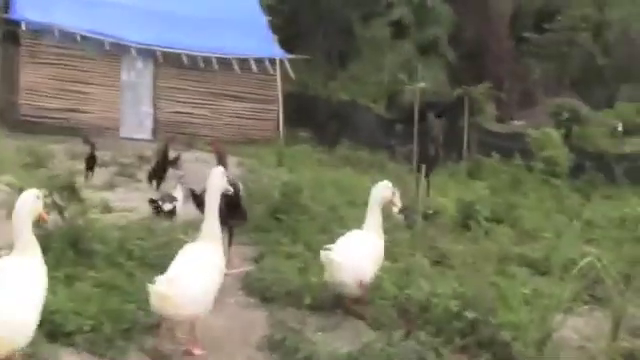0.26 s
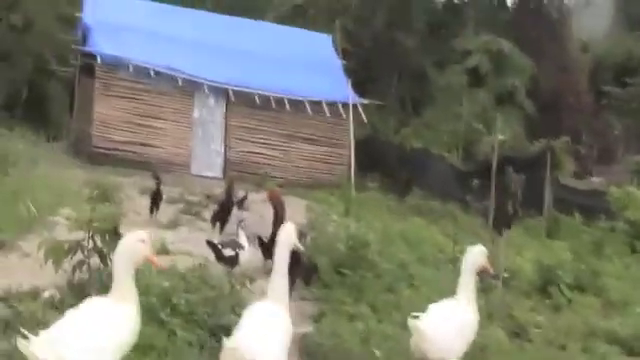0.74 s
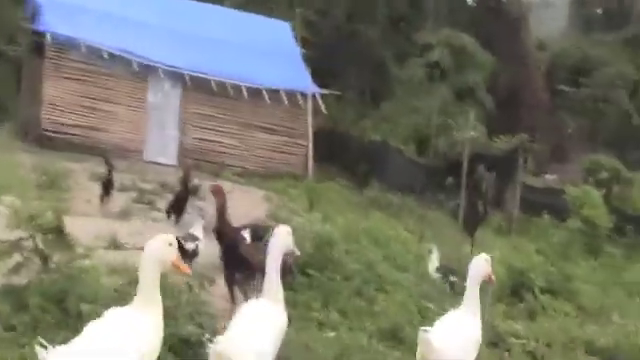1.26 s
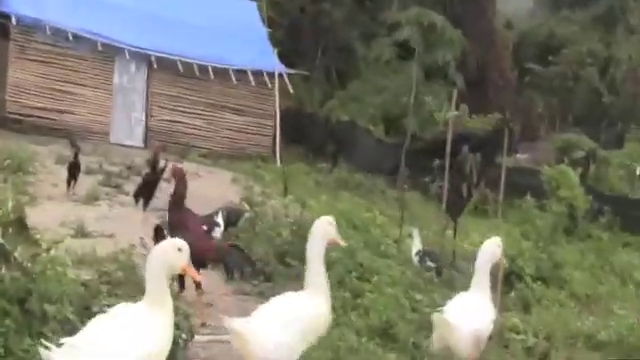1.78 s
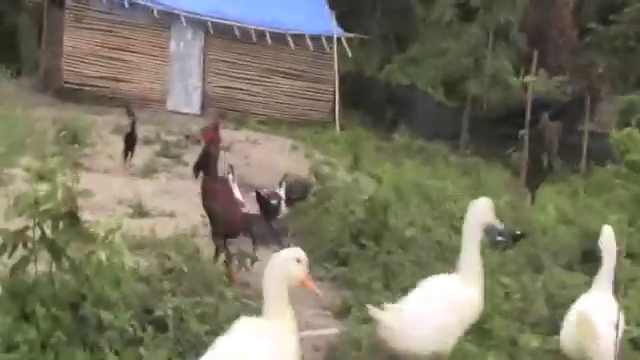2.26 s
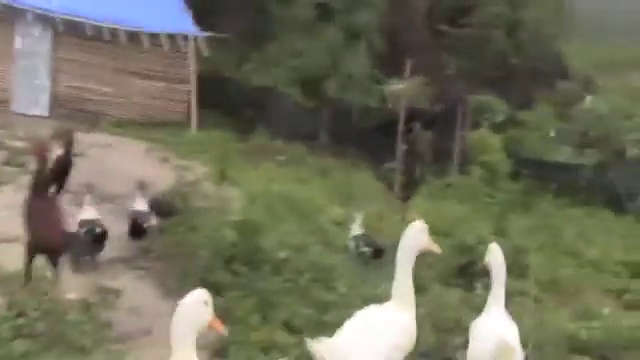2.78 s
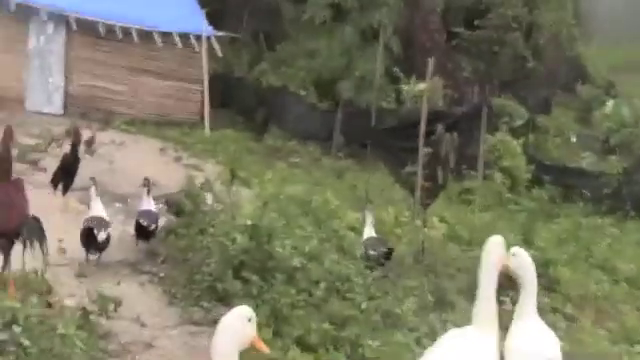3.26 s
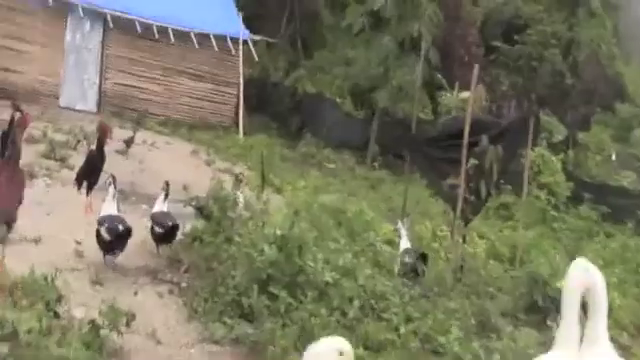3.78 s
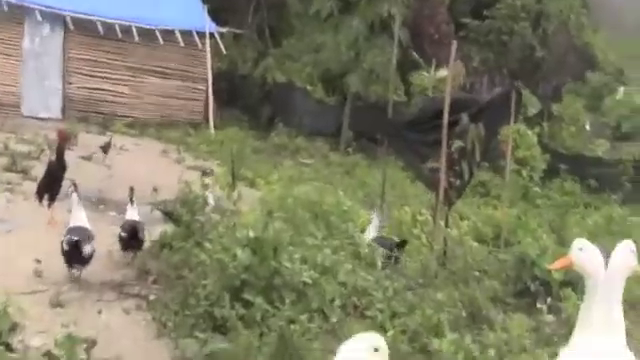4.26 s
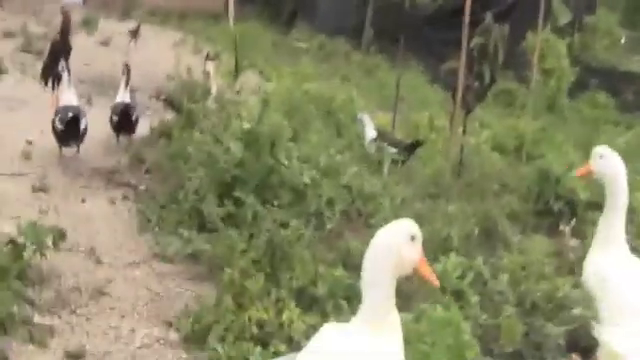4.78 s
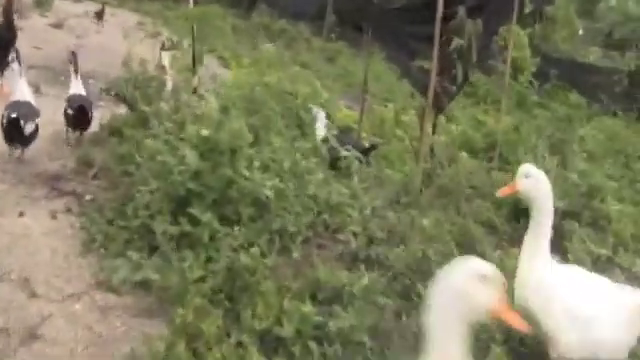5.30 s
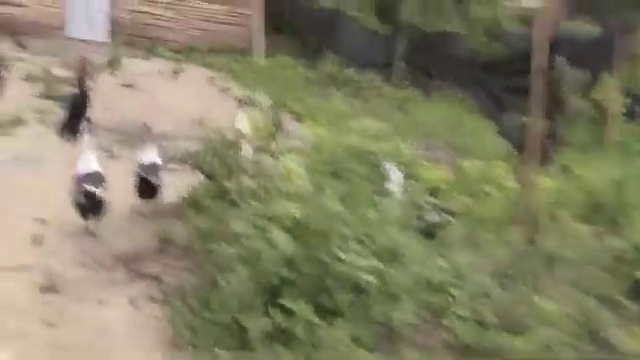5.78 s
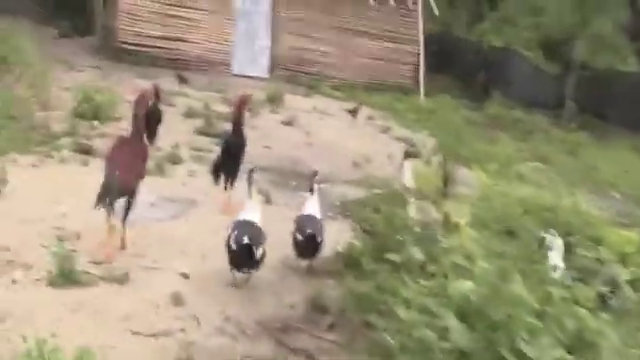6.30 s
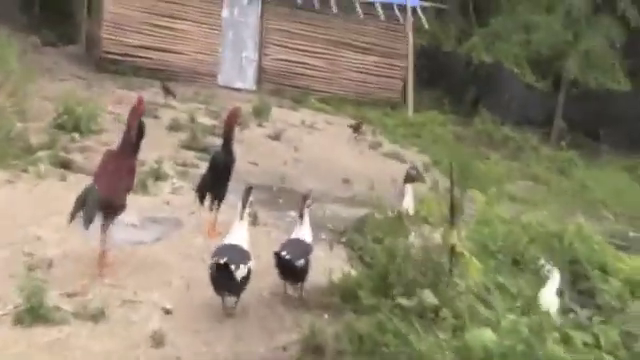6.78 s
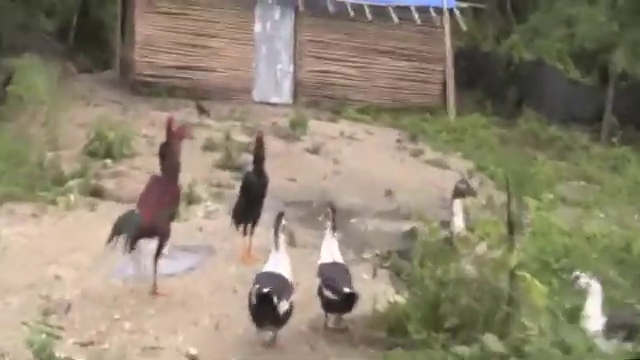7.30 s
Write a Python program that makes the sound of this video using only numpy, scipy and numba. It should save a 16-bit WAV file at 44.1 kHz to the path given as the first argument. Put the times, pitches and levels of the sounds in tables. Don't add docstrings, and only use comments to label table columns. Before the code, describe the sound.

Overlapping short duck quacks, breathy puffs and bill snaps run continuously outdoors, with raspy drake calls and faint hen croons over soft leaf rustle.

```python
import sys
import numpy as np
from scipy import signal
from scipy.io import wavfile
from scipy.ndimage import uniform_filter1d
from numba import njit

SR = 44100
rng = np.random.default_rng(int(sys.argv[2]) if len(sys.argv) > 2 else 0)


def how_loud(loudness_db):
    steps = np.asarray(loudness_db, float) / 20
    return 10 ** steps


def inscribe(sig):
    pcm = np.round(np.clip(np.atleast_2d(sig).T, -1, 1) * 32767)
    wavfile.write(sys.argv[1], SR, pcm.astype(np.int16))


N = 332778
LEFT_RIGHT = np.array([[1], [-1]])


@njit
def svf(x, hz, width):
    y, b, l = np.empty(len(x)), 0., 0.
    for i in range(len(x)):
        g, k = np.tan(np.pi * hz[i] / SR), width[i] / hz[i]
        v = (b + g * (x[i] - l)) / (1 + g * (g + k))
        b, l, y[i] = 2 * v - b, l + 2 * g * v, k * v
    return y


def band(x, hz, width):
    hz, width = hz + np.zeros(len(x)), width + np.zeros(len(x))
    return svf(svf(x, hz, width), hz, width)


def modes(x, table):
    return sum((-1) ** k * how_loud(db) * band(x, hz, width) for k, (hz, width, db) in enumerate(table))


def unit(x):
    return x / np.sqrt(np.mean(x ** 2) + 1e-18)


def peak_to(x, db):
    return x * how_loud(db) / np.sqrt(uniform_filter1d(x ** 2, size=350).max() + 1e-18)


def walk(rate_hz):
    hold = int(SR / rate_hz)
    steps = np.repeat(rng.standard_normal(N // hold + 1), hold)
    return 1.7 * uniform_filter1d(uniform_filter1d(steps, hold), hold)[:N]


def arch(size, skew, power):
    return abs(np.sin(np.pi * np.linspace(0, 1, size) ** skew)) ** power


def add(out, piece, s):
    i = int(s * SR)
    out[i:i + len(piece)] += piece[:N - i]


def flaps(hz, jitter, scatter_db, since=0):
    turns = np.cumsum(hz * np.exp(jitter * walk(150))) / SR
    turns = turns - turns[since]
    flap = np.diff(np.floor(turns), prepend=0) > 0
    return unit(flap * how_loud(scatter_db * rng.standard_normal(N))), turns % 1


def drake():
    # (start [s], length [s], hiss [dB], throat [dB], fade over the rasp [dB])
    rasps = [(0, 0.24, -41.5, -25, -11.5), (0.581, 0.63, -34.5, -25.5, -34), (1.298, 0.45, -38, -27.5, -21),
             (1.875, 0.07, -30.5, -24.5, 8.5), (1.942, 0.28, -40, -28.5, -5), (2.606, 0.36, -42, -30, -3.5),
             (3.258, 0.31, -42, -27, -5), (4.014, 0.43, -30.5, -19.5, -33), (4.65, 0.43, -37, -25.5, -17.5),
             (5.4, 0.36, -45.5, -34.5, 4), (6.077, 0.25, -42, -30, -3), (6.769, 0.27, -41.5, -31.5, -3),
             (7.046, 0.16, -50, -45, 7.5), (7.498, 0.11, -39.5, -24.5, 9)]
    # (centre [Hz], width [Hz], level [dB])
    throat_modes = [(487, 1450, -2), (1100, 590, 2.5), (1650, 770, 1), (3100, 4060, -8), (4200, 2830, -4)]
    # (centre [Hz], width [Hz], level [dB])
    hiss_modes = [(4900, 6800, 3), (10440, 4200, 5.5)]
    throat_wander = .1
    clicks, phase = flaps(130 + np.zeros(N), jitter=.6, scatter_db=3.5)
    air = rng.standard_normal((2, N)) * (.5 + np.exp(-phase / .3)) * how_loud(3 * walk(45))
    throat_gain, hiss_gain = np.zeros((2, N))
    for s, length_s, hiss_db, throat_db, fade_db in rasps:
        size = int(length_s * SR)
        push = arch(size, .55, .45) * how_loud(np.linspace(0, fade_db, size))
        add(throat_gain, how_loud(throat_db) * push, s)
        add(hiss_gain, how_loud(hiss_db) * push, s)
    drifting = [(hz * np.exp(throat_wander * walk(30)), width_hz, db + 2 * walk(35))
                for hz, width_hz, db in throat_modes]
    rasp = unit(modes(air[0] + .28 * unit(band(clicks, 1400., 2000.)), drifting))
    hiss = unit(modes(air[1] + .04 * clicks, hiss_modes))
    return throat_gain * rasp, hiss_gain * hiss


def yard():
    # (frequency [Hz], density [dB per Hz])
    spectrum = [(18, -63), (30, 5), (81, -24), (189, 6.5), (353, -3.5), (1190, 5), (1530, 1.5),
                (7530, -15.5), (9900, -10), (11500, -39), (15000, -75), (22000, -120)]
    level_db = -40
    out = 0
    point_hz, point_db = np.transpose(spectrum)
    for hz in 35 * 2 ** np.arange(0, 8.6, .5):
        mid, side = (unit(band(rng.standard_normal(N), hz, hz / 1.65)) for _ in range(2))
        density_db = np.interp(np.log(hz), np.log(point_hz), point_db)
        db = density_db + 10 * np.log10(hz) + 2.8 * walk(12)
        out = out + how_loud(db) * (mid + 0.48 / (1 + hz / 3000) * side * LEFT_RIGHT)
    return unit(out) * how_loud(level_db)


def throat(drive, voiced, table, breathy_width, voiced_width, skew, overtone_db, purity):
    out, tail = np.zeros(N), 500
    for s, length_s, db, start_hz, end_hz in table:
        i, size = int(s * SR), int(length_s * SR)
        puff = drive[i:i + size] * arch(size, skew, 0.34)[:N - i]
        puff = np.append(puff, np.zeros(tail))
        hz = np.interp(np.arange(len(puff)), [.1 * size, .9 * size], [start_hz, end_hz])
        voicing = np.append(voiced[i:i + size], np.zeros(tail) + voiced[i])
        width = breathy_width + (voiced_width - breathy_width) * voicing
        if length_s < .062:
            whistle = np.sin(2 * np.pi * np.cumsum(hz) / SR)
            whistle += .5 * np.sin(2 * np.pi * np.cumsum(2.15 * hz) / SR)
            swell = arch(size, skew, 1)[:N - i] * (1 - voiced[i:i + size])
            puff[:-tail] += purity * whistle[:-tail] * swell
        ring = band(puff, hz, width) + how_loud(overtone_db) * band(puff, 2.1 * hz, width)
        add(out, peak_to(ring, db), s)
    return out


def far_flock(count, mean_db):
    draw = rng.random((count, 5)).T
    start_s, length_s = 7.4 * draw[0], .008 + .04 * draw[1]
    start_hz = 550 * 4 ** draw[3]
    end_hz = start_hz * (.7 + .6 * draw[4])
    calls = np.transpose([start_s, length_s, mean_db + 9 * draw[2], start_hz, end_hz])
    rasp = flaps(140 + np.zeros(N), jitter=.3, scatter_db=4)[0] + .7 * rng.standard_normal(N)
    ticks = (rng.random(N) < 6 / SR) * how_loud(4 * rng.standard_normal(N))
    voices = throat(rasp, np.zeros(N), calls, 450., 450., .7, -8, .05)
    return voices + how_loud(-22) * band(ticks, 2600., 4500.)


def bill_snaps():
    # (time [s], peak [dB], ring [Hz])
    snaps = [(0.0972, -15, 1730), (0.146, -18, 1530), (0.3514, -14.5, 1560), (0.587, -23, 1590),
             (0.614, -13.5, 1600), (0.712, -19, 1220), (1.0105, -13, 1660), (1.0475, -24, 1630),
             (1.1638, -23, 1780), (1.269, -16, 1250), (1.3853, -10.5, 1410), (1.5574, -16, 1510),
             (1.7035, -17.5, 1540), (1.8936, -14, 1600), (1.9153, -9, 3030), (1.9669, -16, 1580),
             (2.0013, -6.5, 1590), (2.9087, -14, 1280), (2.945, -19, 1200), (3.1862, -30, 2050),
             (3.328, -13.5, 1480), (3.5866, -16.5, 1830), (3.611, -26, 1460), (3.6246, -26, 1500),
             (3.675, -26, 1390), (3.7842, -16, 1290), (3.8611, -19.5, 1550), (3.9488, -16.5, 1320),
             (4.0063, -12, 1230), (4.0257, -22, 1450), (4.1062, -15, 1320), (4.1433, -16, 1270),
             (4.1942, -28, 1320), (4.2028, -19, 1660), (4.2261, -8.5, 1550), (4.5134, -14, 1250),
             (4.6048, -20, 2420), (4.631, -22, 1430), (4.6543, -20, 1192), (4.6788, -8, 1270),
             (4.754, -28, 1210), (4.885, -17, 1940), (5.1798, -13.5, 1940), (5.422, -15, 1930),
             (5.5134, -11, 1220), (5.627, -14, 1390), (6.1356, -12, 1690), (6.1617, -8, 1630),
             (6.3936, -29, 1230), (6.491, -11, 1860), (6.526, -13, 1310), (6.7565, -27, 4000),
             (6.8427, -10.5, 1410), (6.8973, -13, 1640), (6.9654, -23, 1360), (6.9908, -17, 1380),
             (7.077, -18, 1490), (7.5154, -18, 1650)]
    decay_s, crack_share = 0.00071, 0.27
    out, t = np.zeros(N), np.arange(300) / SR
    for s, db, hz in snaps:
        crack = unit(band(rng.standard_normal(len(t)), 2670.0, 5400.0))
        ring = np.sin(2 * np.pi * hz * t)
        add(out, how_loud(db) * np.exp(-t / decay_s) * (ring + crack_share * crack), s)
    return out - band(out, 135.0, 1260.0)


def score():
    # (start [s], throat [dB], chest [dB], peep [dB], peep top [Hz])
    clucks = [(0.144, -23, -34, -26.5, 1723), (.283, -25.5, -40, -41, 1970), (0.995, -35, -34.5, -44, 1600),
              (1.179, -31, -36.5, -30.5, 1550), (1.806, -36, -37, -42, 1610), (2.334, -27, -42, -38, 1960),
              (2.523, -25.5, -40.5, -37.5, 1892), (3.036, -26.5, -37.5, -45, 1500),
              (3.388, -30, -41, -30, 2145), (3.903, -24.5, -38, -31, 1503), (4.254, -27, -33, -29, 2053),
              (4.841, -23.5, -33, -22, 1934), (5.011, -23.5, -33, -26.5, 1830),
              (5.255, -24, -33, -31, 1347), (5.405, -25, -32.5, -25.5, 1996), (5.59, -27, -40, -27.5, 1895),
              (5.803, -30.5, -38.5, -32, 1317), (6.267, -29, -34.5, -26, 1750),
              (6.45, -29, -33.5, -28.5, 1695), (3.733, -29, -40, -34, 1474),
              (4.512, -22.5, -31, -27.5, 1225), (5.937, -32.5, -32, -51, 1270),
              (7.252, -31.5, -32, -28.5, 1885), (7.42, -31, -33.5, -25, 1900)]
    # (start [s], length [s], throat [dB], chest [dB], pulse rate [Hz])
    open_quacks = [(0.294, 0.054, -27.5, -36, 177.3), (0.368, 0.03, -18, -31, 204.9),
                   (0.61, 0.057, -28, -38.5, 193.8), (1.618, 0.037, -30.5, -37, 155.6),
                   (2.155, 0.059, -23.5, -29.5, 201.8), (2.412, 0.03, -14, -32, 210),
                   (2.603, 0.049, -28, -37.5, 212.6), (2.819, 0.04, -34, -30.5, 200.3),
                   (3.468, 0.044, -13.5, -28.5, 220.5), (4.075, 0.045, -33, -52, 201.2),
                   (4.158, 0.023, -11.5, -30.5, 198.4), (5.605, 0.041, -22, -35, 178.3),
                   (6.084, 0.033, -31.5, -37.5, 212)]
    # (start [s], length [s], throat [dB], chest [dB], pulse rate [Hz])
    opening_quacks = [(1.288, 0.074, -28, -44.5, 173.7), (1.874, 0.046, -25.5, -30.5, 262.7),
                      (1.972, 0.05, -27, -31.5, 197.6), (2.231, 0.023, -24.5, -36, 197.3),
                      (3.119, 0.026, -22.5, -36, 188.6), (3.29, 0.032, -17.5, -32.5, 194.6),
                      (3.788, 0.028, -26, -39, 166), (4.559, 0.034, -30.5, -43, 159.7),
                      (4.92, 0.028, -17.5, -37, 171.2), (5.089, 0.043, -13, -33, 169.6),
                      (5.302, 0.032, -25.5, -36.5, 161.4), (5.481, 0.038, -14.5, -31, 210.9),
                      (6.512, 0.041, -21.5, -28.5, 207)]
    # (start [s], length [s], throat [dB], chest [dB], pulse rate [Hz])
    closing_quacks = [(.506, 0.022, -47, -32, 177), (.84, 0.08, -33, -30.5, 222.5),
                      (1.081, 0.043, -27.5, -36.5, 177.8), (4.332, 0.023, -27.5, -41.5, 189.5),
                      (4.674, 0.024, -29, -39, 203.2), (4.735, 0.031, -29.5, -41, 210.6),
                      (5.529, 0.023, -33, -41, 234), (5.667, 0.03, -16, -31.5, 167.9),
                      (5.989, 0.028, -29.5, -41, 185), (6.173, 0.027, -27, -40, 188.8),
                      (6.347, 0.034, -19.5, -32, 181.2), (6.382, 0.037, -31, -38, 203),
                      (6.914, 0.037, -34, -35.5, 226.6), (7.071, 0.067, -20.5, -30.5, 177.7),
                      (7.325, 0.028, -23, -34.5, 176.8), (7.495, 0.031, -21, -31, 193)]
    # (lower from [Hz], lower to [Hz], upper from [Hz], upper to [Hz],
    # upper relative to lower [dB])
    bill_motion = [
        (1120, 1170, 1390, 1380, -19.5),
        (770, 1154, 1560, 1550, -6),
        (757, 636, 1790, 1290, -6.5),
    ]
    # (lead [s], level [dB], from [Hz])
    swoop_starts = [
        (.003, -6, 1550),
        (.005, -5, 1900),
        (.005, -7, 1800),
    ]
    # (start [s], length [s], peak [dB], starting pitch [Hz])
    low_puffs = [(1.251, 0.031, -20, 1100), (1.548, 0.025, -29.5, 590), (1.718, 0.016, -32, 545),
                 (1.834, 0.015, -28.5, 647), (2.048, 0.056, -28.5, 1210), (2.796, 0.036, -19, 1160),
                 (2.861, 0.016, -25.5, 1070), (4.047, 0.016, -26, 935), (4.492, 0.032, -28, 585),
                 (6.838, 0.0084, -34.5, 1050), (5.267, 0.02, -28, 1026), (5.706, 0.012, -23, 664),
                 (7.028, 0.022, -26.5, 970), (6.136, 0.028, -30, 1030), (6.282, 0.042, -19.5, 1090),
                 (6.479, 0.061, -19, 1080), (7.428, 0.056, -32.5, 730), (0.399, 0.0094, -27, 1110),
                 (3.21, 0.02, -31.5, 1020), (3.43, 0.058, -25, 1100), (6.649, 0.048, -29.5, 1150)]
    # (start [s], length [s], peak [dB], starting pitch [Hz])
    high_puffs = [(0.482, 0.034, -31, 1424), (.577, 0.21, -29.5, 1460), (.844, 0.068, -31, 1460),
                  (1.227, 0.059, -26, 1448), (1.335, 0.12, -29.5, 1370), (1.442, 0.089, -25.5, 1620),
                  (1.956, 0.036, -25, 1625), (2.443, 0.045, -28, 1703), (2.651, 0.14, -30.5, 1440),
                  (2.793, 0.051, -25, 1550), (3.09, 0.037, -26.5, 1353), (3.322, 0.033, -24, 1457),
                  (3.351, 0.03, -26.5, 1510), (4.016, 0.1, -29, 1380), (4.69, 0.04, -24.5, 1961),
                  (4.819, 0.026, -34, 1500), (4.911, 0.049, -41, 1790), (6.154, 0.024, -28, 1530),
                  (6.653, 0.061, -29.5, 1566), (7.177, 0.073, -31.5, 1680), (2.124, 0.068, -19.5, 1520),
                  (5.821, 0.069, -32, 1450), (6.485, 0.048, -18.5, 1776), (0.378, 0.013, -15, 1400),
                  (.285, 0.034, -26.5, 1700), (4.1, 0.023, -35, 1280)]
    # (start [s], length [s], peak [dB], starting pitch [Hz])
    falling_puffs = [(1.709, 0.024, -37, 2910), (3.262, 0.034, -23.5, 1604), (3.657, 0.064, -27.5, 1480),
                     (3.953, 0.059, -30.5, 1507), (3.785, 0.0255, -25, 1446), (5.97, 0.0294, -41, 1224),
                     (4.399, 0.045, -40.5, 3100), (6.048, 0.16, -25, 1870), (6.392, 0.034, -28, 1880),
                     (6.952, 0.0332, -32, 1690), (7.142, 0.023, -26.5, 1800), (7.182, 0.02, -37, 3070),
                     (7.438, 0.02, -37, 3006)]
    cluck_s, cluck_pulse_hz, cluck_from_hz, cluck_to_hz = 0.0145, 226.3, 1020, 1070
    peep_lag_s, peep_rise_s, peep_crest_s, peep_rise_db = 0.0088, 0.023, 0.034, -1.5
    peep_start_share, peep_end_share = .72, .93
    voice_lag_s = .008
    ring_lag_s = 0.00326
    swoop_s, swoop_to_hz = .017, 800
    low_rise, high_rise, fall = 1.07, 1.05, .78

    grunts, lower, upper, glides, swoops = [], [], [], [], []
    for s, throat_db, chest_db, peep_db, top_hz in clucks:
        grunts.append((s, cluck_s, chest_db, cluck_pulse_hz))
        lower.append((s, cluck_s, throat_db, cluck_from_hz, cluck_to_hz))
        rise_db = peep_db + peep_rise_db
        glides.append((s + peep_lag_s, peep_rise_s, rise_db, peep_start_share * top_hz, top_hz))
        glides.append((s + peep_rise_s, peep_crest_s, peep_db, top_hz, peep_end_share * top_hz))
    groups = (open_quacks, opening_quacks, closing_quacks)
    for quacks, motion, swoop in zip(groups, bill_motion, swoop_starts):
        low_from, low_to, high_from, high_to, below_db = motion
        lead_s, swoop_db, swoop_hz = swoop
        for s, length_s, db, chest_db, pulse_hz in quacks:
            grunts.append((s + voice_lag_s, length_s - voice_lag_s / 2, chest_db, pulse_hz))
            ring_s, ring_length_s = s + ring_lag_s, length_s - ring_lag_s
            lower.append((ring_s, ring_length_s, db, low_from, low_to))
            upper.append((ring_s, ring_length_s, db + below_db, high_from, high_to))
            swoops.append((s - lead_s, swoop_s, db + swoop_db, swoop_hz, swoop_to_hz))
    puff_sets = ((lower, low_puffs, low_rise), (upper, high_puffs, high_rise), (glides, falling_puffs, fall))
    for rings, puffs, glide in puff_sets:
        rings.extend((s, length_s, db, hz, glide * hz) for s, length_s, db, hz in puffs)
    return sorted(grunts), lower, upper, glides, swoops


def syrinx(grunts):
    flap_soft_hz = 2350
    table = np.array(grunts)
    last = np.clip(np.searchsorted(table[:, 0] - .006, np.arange(N) / SR) - 1, 0, None)
    grunt_start = np.searchsorted(last, last)
    clicks, phase = flaps(table[last, 3], jitter=.05, scatter_db=2.4, since=grunt_start)
    soften = signal.butter(2, flap_soft_hz, fs=SR, output="sos")
    clicks = unit(signal.sosfilt(soften, clicks))
    tone = np.sin(2 * np.pi * phase) + 0.067 * np.sin(4 * np.pi * phase)
    tone += .6 * unit(band(clicks, 430., 300.))
    tone += .04 * unit(band(clicks + rng.standard_normal(N), 100., 150.))
    tone += 0.45 * unit(band(clicks + rng.standard_normal(N), 286.0, 104.0))
    tone += .5 * unit(band(clicks, 1310.0, 540.0))
    voiced, chest = np.zeros(N), np.zeros(N)
    for s, length_s, db, _ in grunts:
        i, size = int(s * SR), int(length_s * SR)
        add(chest, how_loud(db + 6) * arch(size, 0.84, 1.5) * tone[i:i + size], s)
        add(voiced, arch(size + 700, 0.92, 1.0), max(s - .008, 0))
    voiced = np.clip(voiced, 0, 1)
    breath = rng.standard_normal(N) * (1 - voiced * (1 - .5 * np.exp(-phase / .4)))
    flutter = flaps(90 + np.zeros(N), jitter=.35, scatter_db=4)[0]
    return voiced * clicks + breath + .45 * (1 - voiced) * flutter, chest, voiced


def chatter():
    # (start [s], length [s], level [dB], strongest high mode [Hz])
    nasal_quacks = [(0.282, 0.041, -30.5, 4500), (0.476, 0.056, -36, 4300), (0.855, 0.054, -33, 4130),
                    (1.888, 0.046, -24, 2980), (5.026, .04, -44, 3900), (7.077, .055, -36, 3730),
                    (4.277, 0.022, -40, 4200), (5.6, 0.048, -34.5, 3500), (2.158, 0.057, -36.5, 4187),
                    (2.349, 0.045, -38.5, 3860), (2.807, 0.049, -36, 4500), (3.412, 0.095, -38, 3700),
                    (4.421, 0.084, -40.5, 1260), (4.854, 0.042, -34, 3750), (6.275, 0.056, -36.5, 3460),
                    (6.48, 0.066, -33, 3500), (7.269, 0.045, -42, 4200), (7.427, 0.07, -38, 4370),
                    (1.08, .045, -39, 3800), (1.199, .06, -42, 5260), (2.55, 0.031, -43, 3880),
                    (2.76, 0.011, -51, 4500)]
    # (centre [Hz], width [Hz], level [dB])
    bill_modes = [(2300, 1100, 3), (4500, 1500, -3), (7000, 1500, -10)]
    grunts, lower, upper, glides, swoops = score()
    drive, chest, voiced = syrinx(grunts)
    unvoiced = np.zeros(N)
    out = chest + throat(drive, voiced, lower, 430., 330., .85, -20, .014)
    out += throat(drive, voiced, upper, 270., 520., .8, -16, .12)
    out += throat(drive, unvoiced, glides, 350., 350., .9, -13, .27)
    out += throat(drive, unvoiced, swoops, 520., 520., .8, -20, .15)
    for s, length_s, db, hz in nasal_quacks:
        i, size = int(s * SR), int(length_s * SR)
        puff = 0.06 * drive[i:i + size] + rng.standard_normal(size)
        puff = puff * arch(size, 1.0, 0.065)
        add(out, peak_to(modes(puff, bill_modes) + 1.93 * band(puff, hz, 610.0), db), s)
    return out


def hen():
    # (start [s], length [s], level [dB], from [Hz], to [Hz])
    croons = [
        (.855, .052, -27, 447, 440),
        (4.97, .1, -44, 560, 550),
        (5.72, .3, -46, 560, 530),
        (6.53, .22, -44, 590, 530),
        (.858, .045, -37, 670, 660),
        (.86, .04, -35, 894, 880),
    ]
    out = np.zeros(N)
    for s, length_s, db, start_hz, end_hz in croons:
        size = int(length_s * SR)
        hz = np.linspace(start_hz, end_hz, size) * (1 + 0.0051 * walk(39)[:size])
        gain = how_loud(db + 2 * walk(31)[:size]) * arch(size, 0.45, 0.48)
        add(out, gain * np.sin(2 * np.pi * np.cumsum(hz) / SR), s)
    return out


def scene():
    # (time [s], left minus right [dB])
    pan = [
        (0, -.3),
        (5.6, -.5),
        (6.2, -1.3),
        (7.55, -1.4),
    ]
    # (delay [s], level [dB], side -1..1)
    echoes = [
        (.0041, -18, .8),
        (.017, -21, -1),
        (.036, -24, 1),
    ]
    # (centre [Hz], width [Hz], share per dB of pan)
    body_side = (650, 1400, 0.1)
    # (centre [Hz], width [Hz], share)
    spread = [(346, 220, 0.48), (5100, 1900, 0.24)]
    rasp, hiss = drake()
    birds = chatter() + rasp + hen() + bill_snaps() + far_flock(count=200, mean_db=-47)
    pan_db = np.interp(np.arange(N) / SR, *np.transpose(pan))
    out = (birds + hiss) * how_loud(np.array([pan_db, -pan_db]) / 2)
    for s, db, side in echoes:
        late = np.append(np.zeros(int(s * SR)), birds)[:N] * how_loud(db)
        out += late * np.array([[1 + side], [1 - side]]) / 2
    body_hz, body_width_hz, share_per_db = body_side
    out += share_per_db * pan_db * band(birds, body_hz, body_width_hz) * LEFT_RIGHT
    scatter = band(np.roll(hiss, int(.003 * SR)), 9900., 1700.)
    spread_modes = [(hz, width_hz, 20 * np.log10(share)) for hz, width_hz, share in spread]
    scatter += how_loud(-3.5 + 6.1 * walk(6)) * modes(np.roll(birds, int(.002 * SR)), spread_modes)
    return out + .65 * scatter * LEFT_RIGHT + yard()


def narrow_top(x):
    side = (x[0] - x[1]) / 2
    low_pass = signal.butter(8, 10700, fs=SR, output="sos")
    return x + (signal.sosfiltfilt(low_pass, side) - side) * LEFT_RIGHT


def patchy(x, from_hz, patchy_db):
    # (start [s], length [s], from [Hz], to [Hz])
    dropouts = [
        (.47, .18, 7600, 10000),
        (1.38, .08, 7000, 8600),
        (2.82, .07, 7200, 8000),
        (3.73, .05, 7200, 8400),
        (3.79, .06, 5200, 5800),
        (4.06, .085, 6900, 9000),
        (6.47, .08, 7800, 9600),
    ]
    hz, s, cells = signal.stft(x, SR, nperseg=1024)
    draw = rng.standard_normal((130, cells.shape[2] // 2 + 1))
    draw = np.repeat(np.repeat(draw, 4, axis=0), 3, axis=1)[:len(hz), :cells.shape[2]]
    for start_s, length_s, low_hz, high_hz in dropouts:
        inside_band = (hz > low_hz) & (hz < high_hz)
        inside_time = (s > start_s) & (s < start_s + length_s)
        draw[np.ix_(inside_band, inside_time)] -= 2
    depth = np.clip(hz / from_hz - 1, 0, 1)[:, None]
    gain = how_loud(patchy_db * depth * np.minimum(draw, .4 * draw))
    return signal.istft(cells * gain, SR, nperseg=1024)[1][:, :N]


def top_cut(x):
    return signal.sosfilt(signal.butter(12, 11900, fs=SR, output="sos"), x)


def record(dry):
    rounded = np.tanh(dry / 0.93) * 0.97
    thin = signal.sosfilt(signal.butter(3, 65, "high", fs=SR, output="sos"), rounded)
    thin = patchy(narrow_top(thin), from_hz=3500., patchy_db=10)
    mix = signal.sosfilt(signal.ellip(10, .3, 70, 11120, fs=SR, output="sos"), thin)
    return top_cut(mix)


dry = scene()
out = record(dry)
inscribe(out)
```